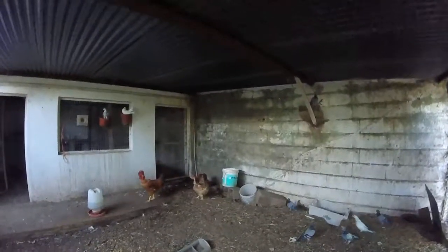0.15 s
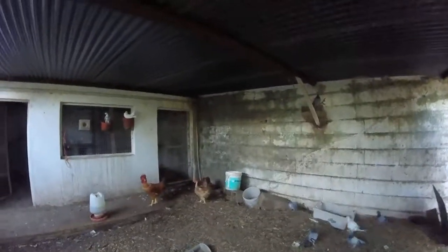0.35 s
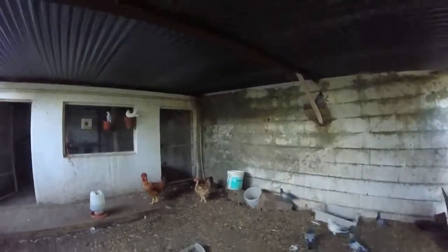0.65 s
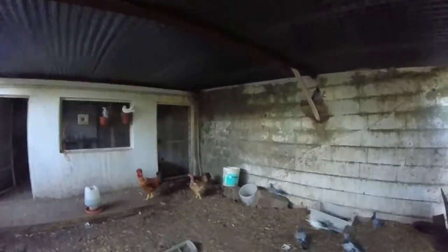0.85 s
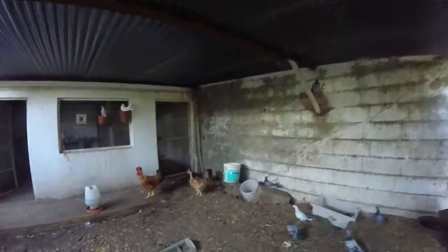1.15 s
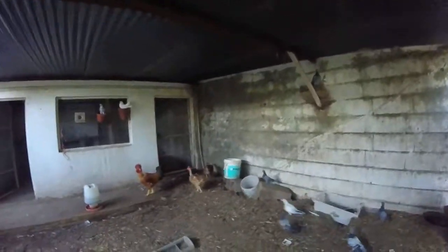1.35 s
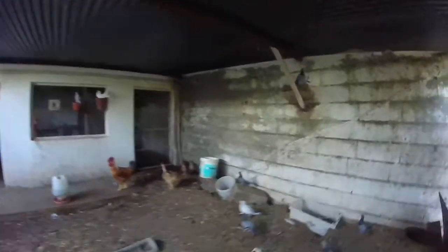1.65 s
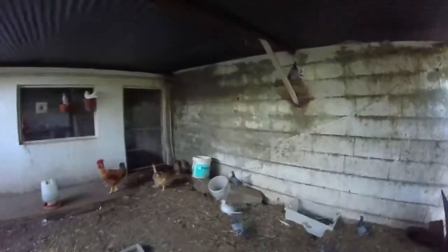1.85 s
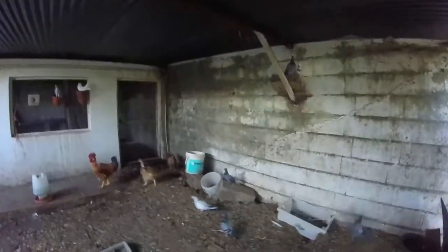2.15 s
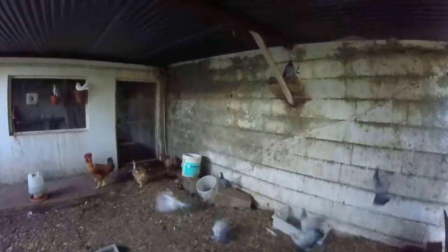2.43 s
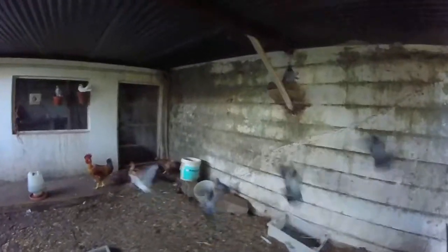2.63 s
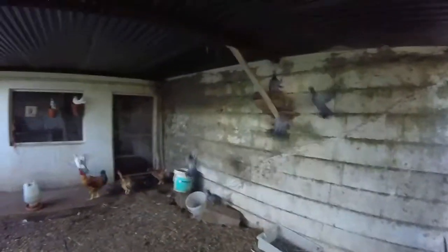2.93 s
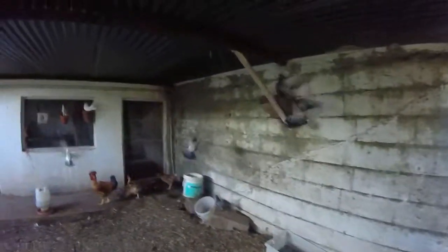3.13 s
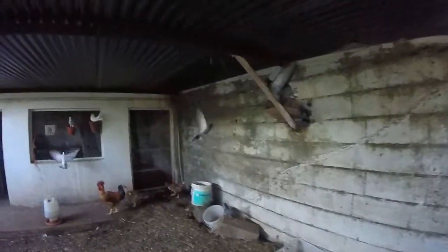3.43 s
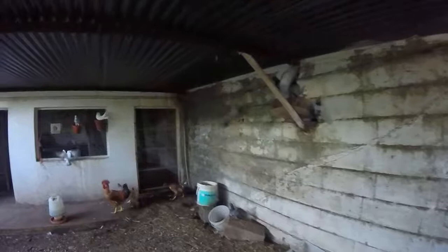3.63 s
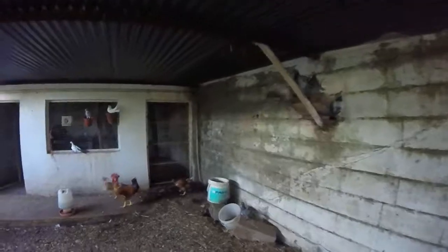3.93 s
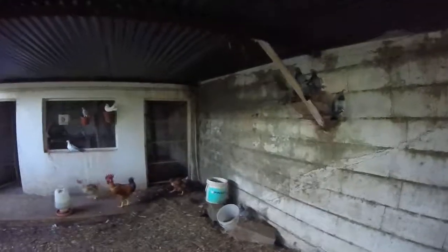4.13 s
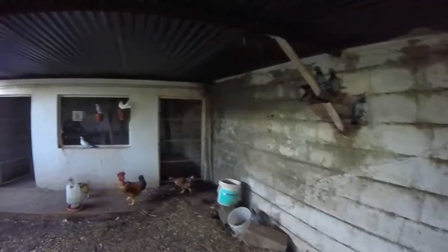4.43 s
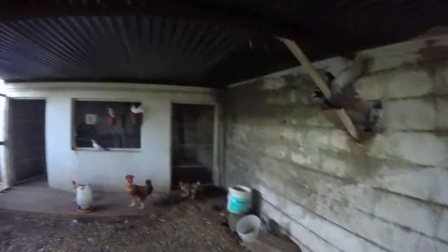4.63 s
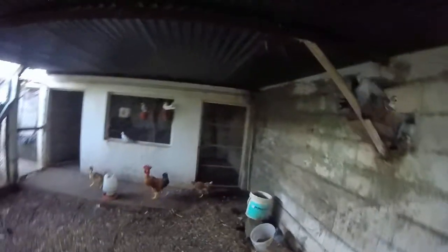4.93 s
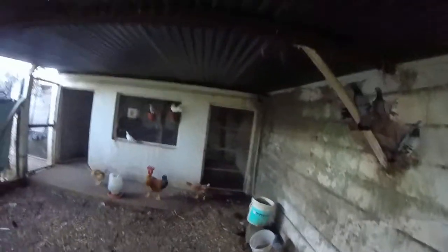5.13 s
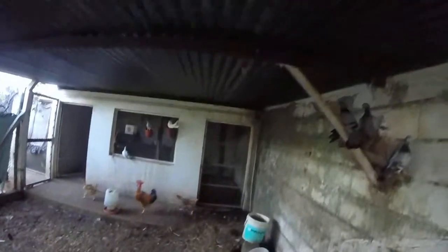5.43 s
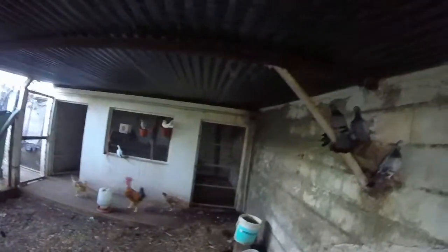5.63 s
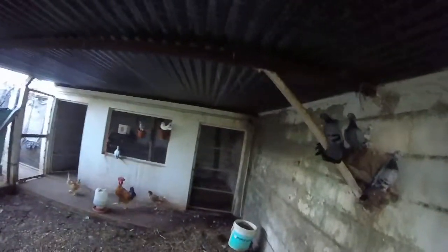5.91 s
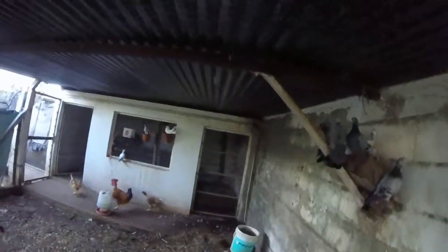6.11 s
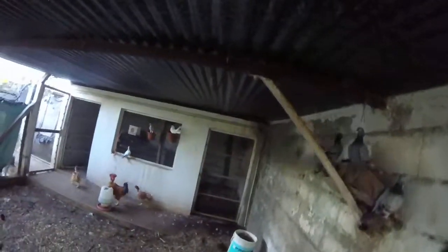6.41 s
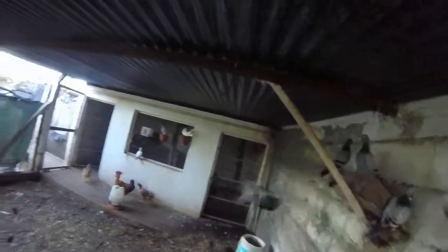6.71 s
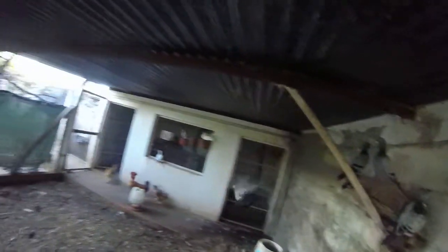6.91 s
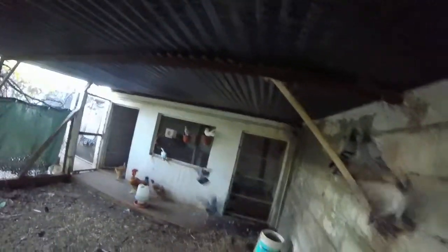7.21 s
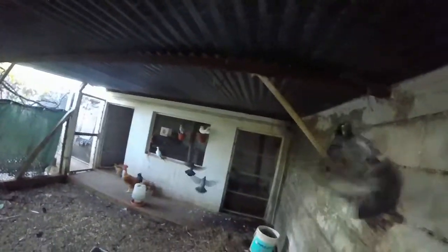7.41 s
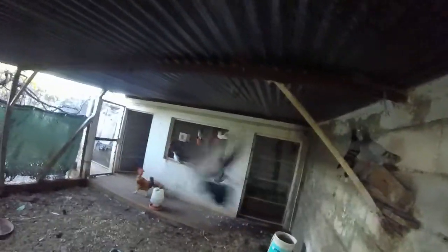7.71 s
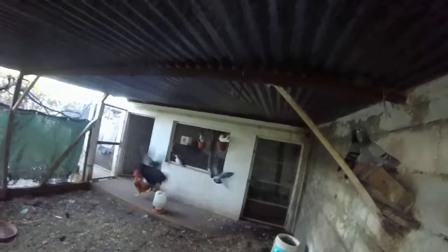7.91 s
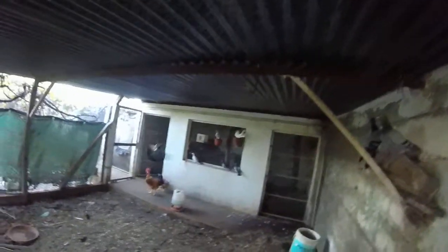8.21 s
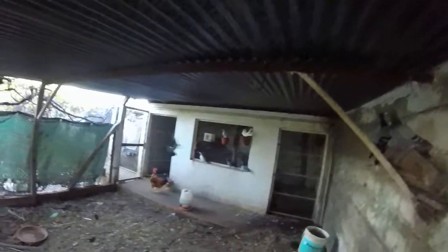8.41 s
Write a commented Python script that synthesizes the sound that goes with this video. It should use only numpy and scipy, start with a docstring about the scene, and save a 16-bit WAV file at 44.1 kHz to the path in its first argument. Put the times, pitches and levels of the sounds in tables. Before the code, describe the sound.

Pigeons shuffle and peck over a low coop hum and fading distant rush, with an occasional short cluck. Wings suddenly flap in a rapid throbbing whirr with airy thuds, then ease into small ticks, metallic claw scratches and a few dull wooden knocks. Another louder burst of flapping passes near the boxed-in microphone, puffing air, before dying down under the short roof echo.

```python
"""Pigeons in a tin-roofed coop

Pigeons mill about and take off in flurries inside a low coop; a hen clucks now and then.
Wings are shaped noise with short whistles, air puffs and knocks on a hollow perch; clucks are sums of
partials; feet, beaks, quills and thuds are noise bursts, and claws ring on wire mesh. A small boxed
microphone favours sound near 800 Hz and 2 kHz. Echoes, far chirps, a fading rush and a murmur lie behind."""
import sys
import numpy as np
from scipy import signal
from scipy.fft import rfft, irfft
from scipy.io import wavfile
from scipy.ndimage import map_coordinates

SR = 44100
rng = np.random.default_rng(int(sys.argv[2]) if len(sys.argv) > 2 else 0)


def decibels_to_gain(level_db):
    """Convert a level in decibels to a linear amplitude gain (20 dB per decade)."""
    exponent = np.asarray(level_db, float) / 20
    return 10 ** exponent


def waveform_to_disk(signal):
    """Save audio, clipped to [-1, 1], as 16-bit WAV at the path in sys.argv[1]."""
    frames = np.transpose(np.atleast_2d(signal))
    scaled = np.clip(frames, -1, 1) * 32767
    samples = np.round(scaled).astype(np.int16)
    wavfile.write(sys.argv[1], SR, samples)


N = 377055

# colour of the wings' whirr: pitch_hz, level_db (per Hz, relative)
WHIRR_COLOUR = [(88, -111), (150, -18), (247, -10), (345, -8.5), (397, -10), (506, -9), (793, -2),
                (948, -5.5), (1190, -21.5), (1450, -23.5), (2120, -16.5), (2320, -19.5), (2820, -34.5),
                (3200, -34), (4160, -40), (7040, -120)]
# colour of rustling feathers and feet: pitch_hz, level_db (per Hz, relative)
RUSTLE_COLOUR = [(1530, 2.5), (2600, 2.5), (2990, -6), (3680, 4.5), (4160, 1), (4510, 1), (5470, -2.5),
                 (6830, -2), (7620, -8.5), (8500, -10), (11000, -57), (18700, -120)]
# colour of the topmost treble: pitch_hz, level_db (per Hz, relative)
TREBLE_COLOUR = [(5000, -19), (8500, -2), (9530, -4.5), (11500, -3), (12600, -5), (14600, -11.5),
                 (15600, -16)]


def rms_one(x):
    """Scale a sound to an rms (average strength) of 1."""
    return x / np.sqrt(np.mean(x ** 2) + 1e-20)


def coloured(x, points):
    """Shape a sound by a spectrum of (Hz, dB), keeping the power of white noise."""
    hz, db = np.transpose(points)
    bin_hz = np.arange(N // 2 + 1) * SR / N
    gain = decibels_to_gain(np.interp(np.log(bin_hz + 1), np.log(hz), db, left=-70, right=-70))
    return irfft(rfft(x) * rms_one(gain), N)


def drift(rate):
    """Smooth random wander around 0, with a spread of about 1 and about rate changes a second."""
    knots = rng.standard_normal(int(rate * N / SR) + 3)
    return map_coordinates(knots, [np.linspace(0, len(knots) - 1, N)], order=3)


def add(track, s, sound):
    """Mix a short sound into a track, with its middle at s seconds."""
    i = round(s * SR) - len(sound) // 2
    track[max(i, 0):i + len(sound)] += sound[max(-i, 0):N - i]


def swell(rise_s, fade_s, sharp=2):
    """Time from the peak, and a bell-shaped rise to 1 with a fade that is a bell (2) or exponential (1)."""
    t = np.arange(-4000, 4001) / SR
    rise = (t / rise_s) ** 2
    fade = np.abs(t / fade_s) ** sharp
    return t, np.exp(-.5 * np.where(t < 0, rise, fade))


def flock():
    """Many wings out of step: stirred air, a whirr that throbs as it grows and a grainy rustle."""
    # how busy the flock is, as the whirr of its wings: time_s, level_db
    bustle = [(0, -47), (0.3, -49.5), (1.55, -51.5), (1.72, -47), (2.18, -50.5), (2.37, -34),
              (2.445, -36.5), (2.55, -33.5), (2.85, -37), (3.6, -42), (3.9, -45), (4.45, -49.5), (4.6, -47),
              (5, -52.5), (5.15, -48.5), (5.6, -56), (5.78, -50.5), (6.02, -49.5), (6.38, -39), (6.47, -40),
              (6.6, -47), (6.68, -43), (6.85, -39), (7.24, -42), (7.53, -30.5), (7.64, -35.5), (7.7, -35),
              (7.85, -39), (8.05, -40), (8.3, -46.5), (8.55, -45.5)]
    # birds in the air stir a draught at the microphone: takeoff_s, landing_s, level_db
    flights = [(2.28, 3.488, -43), (3.502, 3.933, -46), (4.15, 4.206, -55), (6.35, 7.2, -44),
               (7.308, 7.792, -38.5), (7.805, 8.19, -45), (8.22, 8.7, -49)]
    # feet scuffle through the gravel: peak_s, level_db, half_length_s
    scuffles = [(0.55, -70, 0.3), (0.985, -73.5, 0.18), (3.32, -65.5, 0.063), (3.68, -59.5, 0.046),
                (4.067, -61, 0.067), (4.756, -66, .15), (5.16, -64.5, 0.19), (5.746, -71, 0.088),
                (6.32, -59.5, 0.052), (6.16, -70.5, .03), (7.348, -47, 0.027), (7.407, -59, 0.018)]
    # colour of the stirred air: pitch_hz, level_db (per Hz, relative)
    air_colour = [(15, -8), (30, 1.5), (60, -4), (110, -4.5), (200, -13.5), (400, -20), (800, -42)]
    still_air_db, draught_rise_s, draught_fall_s = -55, 0.022, 0.043
    # the rustle at mean bustle, and its share of the bustle's swing in dB
    mean_bustle_db, rustle_db, rustle_follows = -43, -63, 1

    t = np.arange(N) / SR
    whirr_db = np.interp(t, *np.transpose(bustle))
    draught = decibels_to_gain(still_air_db)
    for takeoff_s, landing_s, db in flights:
        rise = -.5 * (np.maximum(takeoff_s - t, 0) / draught_rise_s) ** 2
        fall = -np.maximum(t - landing_s, 0) / draught_fall_s
        draught = draught + decibels_to_gain(db) * np.exp(rise + fall)
    shuffle = decibels_to_gain(rustle_db + rustle_follows * (whirr_db - mean_bustle_db))
    for s, db, half_s in scuffles:
        shuffle = shuffle + decibels_to_gain(db) * np.exp(-.5 * ((t - s) / half_s) ** 2)

    air = coloured(rng.standard_normal(N) * decibels_to_gain(2.0 * drift(30)), air_colour)
    beats = drift(28)       # strokes brighten whirr and rustle together
    throb_depth = np.clip((whirr_db + 60.5) / 14, .15, 1)
    throb_db = throb_depth * (1.86 * beats + 2.0 * drift(70))
    whirr = coloured(rng.standard_normal(N) * decibels_to_gain(throb_db), WHIRR_COLOUR)

    # random loud samples make the noise grainy
    grains = decibels_to_gain(3.6 * np.minimum(rng.exponential(1, N), 5)) * rng.standard_normal(N)
    grains = rms_one(grains * decibels_to_gain(1.4 * beats + 1.8 * drift(60)))
    treble = coloured(grains * decibels_to_gain(0.44 * drift(27)), TREBLE_COLOUR)
    rustle = coloured(grains, RUSTLE_COLOUR) + decibels_to_gain(-10.5) * treble
    return draught * rms_one(air) + decibels_to_gain(whirr_db) * rms_one(whirr) + shuffle * rustle


def strokes(rush_db):
    """Each stroke whistles briefly through the flight feathers on a rush of air."""
    # single wing strokes: peak_s, peak_db (of the whistle), whistle_hz, half_length_s
    wing_strokes = [(1.754, -41, 884, 0.0096), (1.809, -32.5, 710, 0.0018), (2.209, -22.5, 813, 0.0026),
                    (2.322, -28, 844, 0.0044), (2.366, -22, 690, 0.0025), (2.469, -30, 790, .003),
                    (2.481, -28.5, 730, 0.01), (2.517, -21, 787, 0.0047), (2.585, -23, 828, .0053),
                    (2.638, -31, 774, 0.0034), (2.651, -23.5, 768, .006), (2.699, -20, 790, .008),
                    (2.769, -28, 770, 0.005), (2.808, -27.5, 730, .0054), (2.88, -35, 864, .016),
                    (2.916, -31, 830, 0.0056), (3.178, -34.5, 703, .004), (3.419, -31.5, 784, 0.015),
                    (3.604, -27.5, 828, 0.0038), (3.977, -41, 860, 0.0063), (4.092, -33, 774, 0.0072),
                    (4.273, -33.5, 790, 0.0034), (4.355, -39, 845, .01), (4.381, -35, 648, 0.009),
                    (5.198, -30.5, 820, 0.004), (5.235, -41, 768, .008), (6.343, -28.5, 920, 0.0045),
                    (6.355, -26, 924, 0.0078), (6.45, -17.5, 850, 0.0052), (6.475, -27, 883, 0.0067),
                    (6.527, -25, 700, .0025), (6.64, -24.5, 833, 0.0021), (6.919, -35, 457, 0.0044),
                    (7.088, -31.5, 620, 0.0051), (7.11, -37, 850, .012), (7.22, -27.5, 800, .0054),
                    (7.282, -32, 740, 0.0065), (7.336, -35, 815, 0.0082), (7.38, -24, 740, 0.0029),
                    (7.449, -28.5, 910, 0.0027), (7.508, -21.5, 720, 0.0057), (7.615, -21.5, 736, 0.0051),
                    (7.665, -36, 810, 0.0036), (7.684, -26, 806, 0.0048), (7.727, -25, 820, 0.004),
                    (7.802, -32, 937, 0.015), (7.854, -32, 606, 0.0046), (8.075, -35, 652, 0.013),
                    (8.188, -35.5, 652, .0064), (8.32, -39.5, 694, 0.011), (8.437, -38.5, 706, .012)]
    whistle, rush = np.zeros(N), np.zeros(N)
    chance = rng.random((len(wing_strokes), 2))
    for (s, db, hz, half_s), (phase, bend) in zip(wing_strokes, chance):
        t, shape = swell(half_s, half_s)
        cycles = hz * t * (1 + 4.4 * (bend - .5) * t)      # pitch slides a little up or down at random
        add(whistle, s, decibels_to_gain(db) * shape * np.sin(2 * np.pi * (cycles + phase)))
        add(rush, s, decibels_to_gain(db) * shape)
    return whistle + decibels_to_gain(rush_db) * coloured(rush * rng.standard_normal(N), WHIRR_COLOUR)


def puffs(width_s):
    """A wing passes close: a push of air followed by its suck, at even beats."""
    # close passes: first_s, last_s, beats (count), first_db, last_db
    passes = [(3.263, 3.477, 3, -29, -28), (6.524, 6.867, 4, -25.5, -26), (6.941, 7.114, 4, -30, -30),
              (7.291, 7.523, 2, -30, -22.5), (7.571, 7.729, 4, -25, -31), (7.754, 7.966, 2, -26.5, -29),
              (7.922, 8.146, 3, -24.5, -26)]
    out = np.zeros(N)
    t, shape = swell(width_s, width_s)
    for first_s, last_s, beats, first_db, last_db in passes:
        for s, db in np.linspace([first_s, first_db], [last_s, last_db], round(beats)):
            add(out, s, -decibels_to_gain(db) * t / width_s * shape)
    return out


def knocks(spread_db):
    """Wings beat on a hollow perch: each blow wakes the same modes, and feathers brush on unevenly."""
    # wing blows on the wood: peak_s, level_db (before each mode's own level)
    blows = [(5.72, -42.5), (5.814, -32.5), (5.948, -29), (6.085, -36), (6.216, -35)]
    # ways the perch rings: pitch_hz, level_db (relative), later_s (after the blow)
    perch_modes = [(356, -5, 0.014), (590, -0.5, .008), (692, 2, 0.000017), (900, -2.5, 0.00132),
                   (2120, -19, 0.0015)]
    # while a wing presses on, the pitch sags and its phase wavers
    sag_per_s, wobble_radians = 2.5, .9
    out = np.zeros(N)
    chance = rng.random((len(blows), len(perch_modes), 2))
    brush = 1 + .55 * np.array([drift(110) for mode in perch_modes])
    for (s, db), draws in zip(blows, chance):
        t, shape = swell(0.0062, 0.0059, sharp=1.45)
        span = round(s * SR) + np.arange(len(t))
        for (hz, mode_db, later_s), (phase, strength), uneven in zip(perch_modes, draws, brush):
            gain = decibels_to_gain(db + mode_db + spread_db * (strength - .5)) * uneven[span]
            cycles = hz * t * (1 - sag_per_s * t) + phase
            waver = wobble_radians * uneven[span + 9000]    # another stretch of the same wander
            add(out, s + later_s, gain * shape * np.sin(2 * np.pi * cycles + waver))
    return out


def clucks(fall_per_s, hoarse_db):
    """A short voiced puff through the throat, sagging in pitch; uneven cycles blur upper partials most."""
    # hen clucks, and two low thuds near 135 Hz made the same way:
    # peak_s, level_db, pitch_hz, top_hz (beak opening), jitter_radians (of the cycle)
    voiced_puffs = [(.532, -34.5, 292, 1100, .4), (1.045, -34.5, 302, 900, 0.86),
                    (1.298, -36, 136.2, 790, 0.14), (1.498, -38, 135.7, 780, 0.13),
                    (4.382, -41.5, 324, 2190, 0.44), (4.903, -28.5, 327, 676, .05),
                    (5.196, -36, 276.4, 2500, .25), (6.13, -34.5, 256, 2600, .35)]
    # how the throat passes each partial: pitch_hz, level_db (relative)
    throat = [(130, -9.5), (300, -14), (600, -5), (850, -3), (1050, -14), (1400, -13.5), (1750, -17.5),
              (2300, -17.5), (2900, -38)]
    swell_s, fade_cycles, fade_s_per_hz = 0.0069, 1.24, 4e-6   # an open beak lets it ring on
    out = np.zeros(N)
    throat_hz, throat_db = np.transpose(throat)
    wobble = drift(160)
    k = np.arange(1, 23)[:, None]       # partial numbers
    for s, db, hz, top_hz, rough in voiced_puffs:
        t, shape = swell(swell_s, fade_cycles / hz + fade_s_per_hz * top_hz, sharp=1.2)
        uneven = rough * wobble[round(s * SR) + np.arange(len(t))]
        cycle = 2 * np.pi * hz * t * (1 - fall_per_s * t) + uneven
        beak_loss_db = 10 * np.log10(1 + (k * hz / top_hz) ** 8)
        level_db = np.interp(k * hz, throat_hz, throat_db, right=-80) - beak_loss_db
        voice = np.sum(decibels_to_gain(level_db) * np.cos(k * cycle + 0.282 * k ** 2), axis=0)
        add(out, s, decibels_to_gain(db) * shape * voice)
    return out * decibels_to_gain(hoarse_db * drift(150))


def ticks():
    """Quill ticks and pecks: bursts of bright noise, each setting off the microphone box's upper ring."""
    # quills tick on wood and on each other: peak_s, level_db, ring_db (relative to the tick), half_width_s
    quill_ticks = [(1.388, -54.5, -14, .0028), (1.6988, -52, -12, 0.0054), (1.721, -45.5, 5, 0.0035),
                   (2.2088, -41, -1, 0.0031), (2.319, -46, 7, .0033), (2.3328, -44.5, 4, 0.0031),
                   (2.388, -45, -10, 0.0029), (2.4294, -49.5, 8.5, 0.0033), (2.4805, -47, -3, 0.0078),
                   (2.6077, -45.5, -10, 0.0034), (2.656, -42.5, -5, 0.0052), (2.77, -42.5, -1, 0.0067),
                   (2.898, -46.5, -1, 0.0051), (3.025, -53, 7, 0.0028), (3.1087, -49.5, 9, 0.0028),
                   (3.1461, -51, 6.5, .0017), (3.1776, -49, 4, .0017), (3.4294, -57.5, 16.5, 0.0036),
                   (3.543, -52, 13, .003), (3.654, -51, 9, 0.0034), (3.7677, -56.5, 7.5, .004),
                   (3.875, -54, 4, 0.0054), (3.979, -55.5, 14.5, 0.0037), (4.085, -54.5, 8.5, 0.011),
                   (4.21, -51, 14, 0.0031), (4.346, -52, -24, .0036), (4.511, -54, -7, .0025),
                   (4.5704, -53.5, 0, 0.005), (4.77, -55, 6, .004), (4.795, -56, 6, .008),
                   (4.9642, -57, 3, 0.0048), (6.174, -55.5, -9, .0028), (6.3684, -52, -1, .005),
                   (6.4444, -30, 0, 0.0026), (6.503, -38, 2, 0.0025), (6.527, -36.5, 6.5, 0.0014),
                   (6.64, -39.5, 7, .004), (6.7558, -45.5, 3, 0.0017), (6.838, -44, 2, 0.0015),
                   (6.871, -47.5, 7.5, 0.0023), (6.948, -51.5, -4, .004), (7.0622, -50.5, 6, .0018),
                   (7.353, -41, -3.5, .0043), (7.3776, -29.5, -27, 0.0019), (7.394, -41, -8, .0018),
                   (7.458, -39.5, 5.5, 0.0028), (7.4897, -29, 0, 0.0017), (7.5786, -46, 0, 0.0032),
                   (7.6395, -45, -7, 0.0028), (7.6823, -37, -6, 0.0023), (7.757, -46.5, -5, 0.0022),
                   (7.8037, -50.5, 4, 0.0037), (8.0193, -49.5, -3, 0.0064), (8.1769, -53, -7.5, .003)]
    # short bright pecks at the gravel: peak_s, level_db, treble_db (relative to the peck)
    pecks = [(0.468, -56.5, 1), (0.545, -61.5, 11.5), (0.6802, -46, -4), (0.78, -52, -2),
             (0.938, -50.5, -6), (1.8068, -36, -5), (2.836, -45, -6), (2.953, -50, -4), (3.297, -49, -8),
             (3.372, -50, -4), (3.484, -48, -5), (4.85, -57, 0), (5.0715, -51, -2), (5.0977, -61, 12),
             (6.0945, -55.5, -14), (6.158, -58, 0), (6.273, -55, 0), (6.42, -50, 2), (6.575, -52, -4),
             (7.337, -46, 4)]
    # upper ring of the microphone box: pitch_hz, width_hz, level_db (not used)
    box_ring = [(2190, 340, 0)]
    tick_treble_db, peck_ring_db, peck_half_s = -8, 1, 0.00082
    bursts = [(s, db, ring_db, tick_treble_db, half_s) for s, db, ring_db, half_s in quill_ticks]
    bursts += [(s, db, peck_ring_db, treble_db, peck_half_s) for s, db, treble_db in pecks]
    bright, ring, treble = np.zeros((3, N))
    for s, db, ring_db, treble_db, half_s in bursts:
        shape = decibels_to_gain(db) * swell(0.75 * half_s, half_s, sharp=0.77)[1]   # shorter rise than fade
        add(bright, s, shape)
        add(ring, s, decibels_to_gain(ring_db) * shape)
        add(treble, s, decibels_to_gain(treble_db) * shape)
    hz, width, _ = box_ring[0]
    ring_colour = [(hz / 2, -30), (hz - width, -9), (hz, 0), (hz + width / 2, -4), (hz + width, -14),
                   (2 * hz, -25)]
    crackle = rms_one(rng.standard_normal(N) * decibels_to_gain(2.0 * drift(900)))
    out = coloured(bright * crackle, RUSTLE_COLOUR) + coloured(treble * crackle, TREBLE_COLOUR)
    return out + coloured(ring * crackle, ring_colour)


def pings():
    """A claw scrapes over the mesh; a strand of wire rings briefly, rattling and bending as it drags."""
    # claws on wire mesh: peak_s, level_db (before the rattle), pitch_hz (of the strand)
    claws = [(3.957, -52, 4270), (3.970, -43, 6000), (3.982, -43, 4310), (4.016, -43.5, 4140),
             (4.022, -49, 5180), (4.059, -44, 6000), (4.080, -41.5, 4000), (4.131, -48, 6300),
             (4.171, -49.5, 4220), (4.233, -47, 4600), (4.273, -46, 5140), (4.52, -54.5, 6600),
             (4.553, -46, 4170), (5.096, -51, 6890)]
    # colour of the scrape: pitch_hz, level_db (per Hz, relative)
    scrape_colour = [(2600, -30), (3500, -2), (4200, 2), (5200, -5.5), (6500, -3), (8000, -10),
                     (10000, -20), (13000, -38)]
    scrape_db, scrape_s, bend_per_s = -1.5, 0.0034, 2.9     # scrape level is relative to the ring
    out, scrape = np.zeros((2, N))
    t, shape = swell(0.00057, 0.039 / np.log(1000) / 2, sharp=0.83)
    drag = swell(scrape_s / 2, scrape_s, sharp=1.2)[1]
    for (s, db, hz), bend in zip(claws, rng.uniform(-1, 1, len(claws))):
        cycles = hz * t * (1 + bend_per_s * bend * t)
        add(out, s, decibels_to_gain(db) * shape * np.sin(2 * np.pi * cycles))
        add(scrape, s, decibels_to_gain(db + scrape_db) * drag)
    grit = rms_one(rng.standard_normal(N) * decibels_to_gain(4 * drift(700)))
    rattle = .6 + drift(600)
    return out * rattle + coloured(scrape * grit, scrape_colour)


def thuds():
    """Thuds: short bursts of dull noise, some under wing claps."""
    # dull thuds: peak_s, level_db
    dull_thuds = [(1.292, -38), (1.493, -39.5), (1.809, -44), (2.376, -33), (2.518, -31), (3.293, -39),
                  (6.364, -37.5), (6.396, -41.5), (6.523, -31), (6.64, -29), (7.563, -33.5)]
    # colour of the thuds: pitch_hz, level_db (per Hz, relative)
    thud_colour = [(50, -35), (110, 3.5), (200, 2.5), (450, -0.5), (800, -19.5), (1100, -24)]
    shape = np.zeros(N)
    for s, db in dull_thuds:
        add(shape, s, decibels_to_gain(db) * swell(.005, .008, sharp=1.0)[1])
    return coloured(shape * rng.standard_normal(N), thud_colour)


def room(x):
    """Roof and walls answer with a dense tail that dulls as it dies."""
    t60_s, echo_db = 0.41, -13.5    # time for the dull part to die by 60 dB; level of the echoes
    t = np.arange(int(.5 * SR)) / SR
    white = rng.standard_normal(len(t)) * (t > .007)     # first echo after 7 ms
    dull = signal.lfilter([.3], [1, -.7], white)
    # the bright part dies sooner
    tail = dull * decibels_to_gain(-60 * t / t60_s) + white * decibels_to_gain(-60 * t / (0.57 * t60_s))
    return decibels_to_gain(echo_db) * signal.fftconvolve(x, tail / np.sqrt(np.sum(tail ** 2)))[:N]


def far_chirps():
    """Thin notes and one short squeak, made fuzzy by a fast random flutter in level."""
    # far chirps, and one short squeak at 1760 Hz:
    # peak_s, level_db (before the flutter), pitch_hz, half_length_s
    chirps = [(0.046, -67, 3730, .03), (0.125, -66, 3760, .03), (0.526, -45.5, 1760, 0.0044),
              (1.04, -69, 4400, .035)]
    out = np.zeros(N)
    for s, db, hz, half_s in chirps:
        t, shape = swell(half_s, half_s)
        add(out, s, decibels_to_gain(db) * shape * np.sin(2 * np.pi * hz * t))
    return out * (.6 + drift(250))


def far_rush():
    """A far rush, perhaps of traffic: smooth noise that fades steadily from the start."""
    # colour of the rush: pitch_hz, level_db (per Hz, relative)
    rush_colour = [(20, -1), (50, 8), (90, 3), (200, -7), (500, -22), (750, -3), (1000, 4), (1150, -5),
                   (1350, -25), (2600, -38)]
    start_db, loss_db_per_s = -48.5, 9
    level_db = start_db - loss_db_per_s * np.arange(N) / SR
    return decibels_to_gain(level_db) * coloured(rng.standard_normal(N), rush_colour)


def coop_murmur(level_db):
    """The steady murmur of the coop: even noise with a fixed colour."""
    # colour of the coop: pitch_hz, level_db (per Hz, relative)
    coop_colour = [(12, -49), (20, -24), (53, 8), (86, -2.5), (422, -9), (513, -18), (642, -14), (738, -34),
                   (849, 5), (1030, -17), (1480, -17.5), (1760, -26), (2460, -23), (14300, -37),
                   (16000, -65)]
    return decibels_to_gain(level_db) * coloured(rng.standard_normal(N), coop_colour)


def scene():
    """Single events with their echoes over the flock and the steady murmur of the coop."""
    wings = strokes(rush_db=-7.0) + knocks(spread_db=5.0)
    events = wings + clucks(fall_per_s=0.72, hoarse_db=4.0) + thuds() + ticks() + pings()
    near = events + room(events) + puffs(width_s=0.0039) + flock()
    background = far_chirps() + far_rush() + coop_murmur(level_db=-53)
    return (near + background)[None]       # one channel


def band_limit(x):
    """A steep low-pass at the top of the band."""
    return signal.sosfilt(signal.butter(12, 16490, fs=SR, output="sos"), x)


def record(dry):
    """Pass on the finished mix."""
    return band_limit(dry)


dry = scene()
out = record(dry)
waveform_to_disk(out)
```